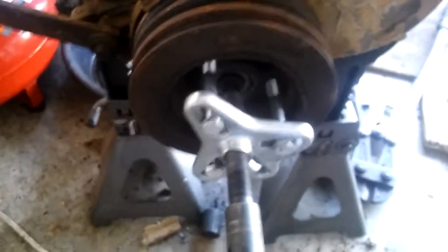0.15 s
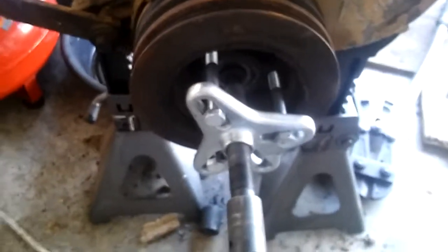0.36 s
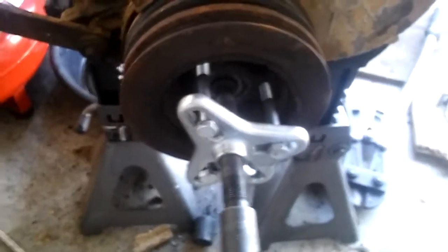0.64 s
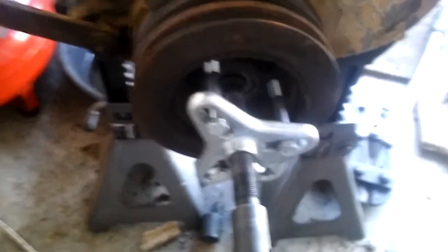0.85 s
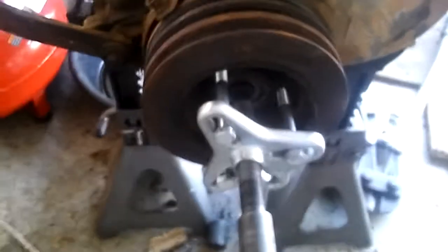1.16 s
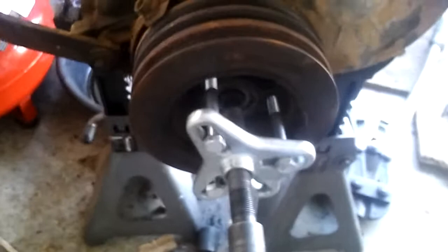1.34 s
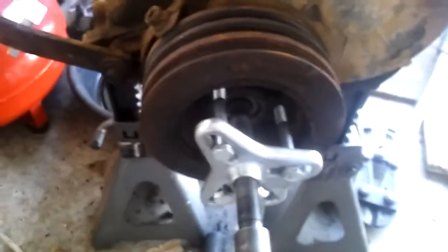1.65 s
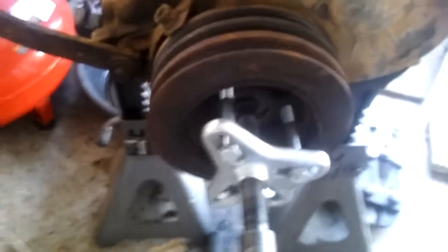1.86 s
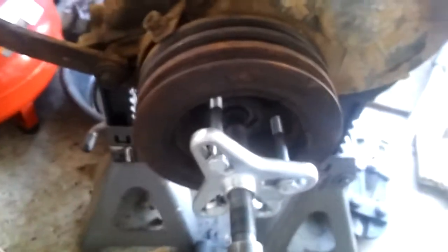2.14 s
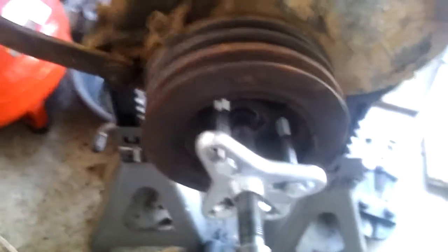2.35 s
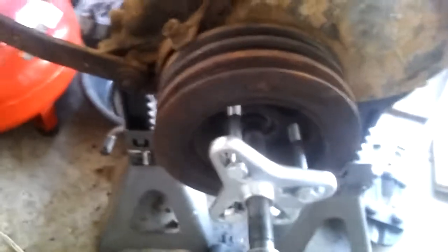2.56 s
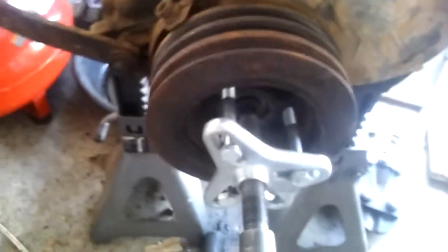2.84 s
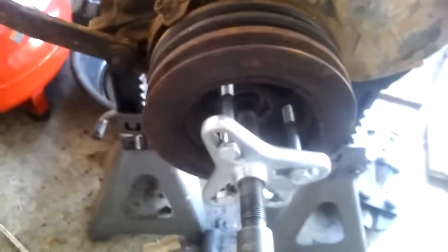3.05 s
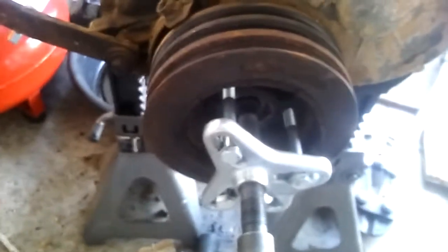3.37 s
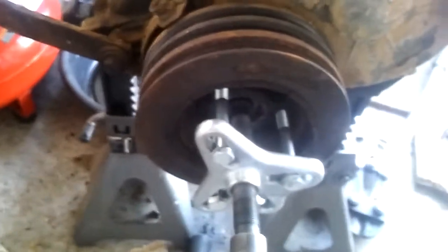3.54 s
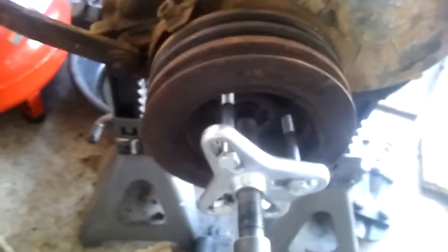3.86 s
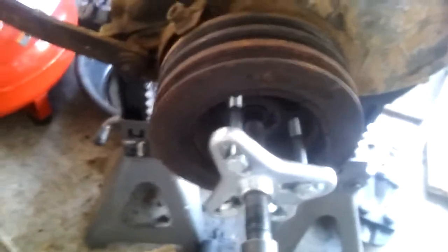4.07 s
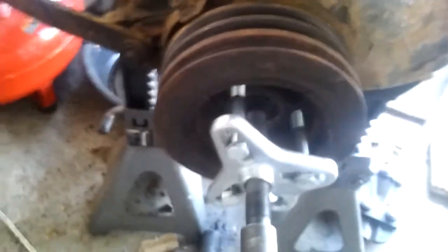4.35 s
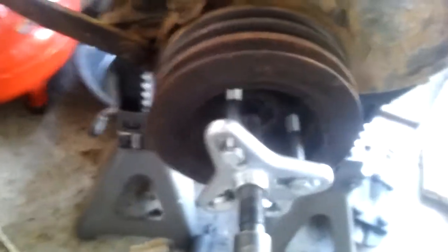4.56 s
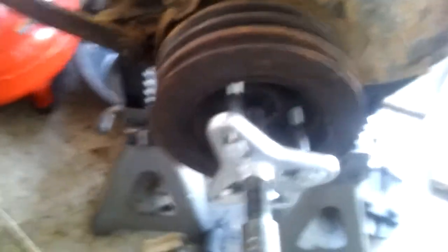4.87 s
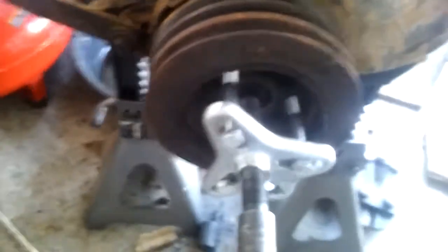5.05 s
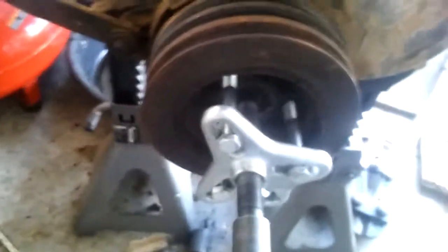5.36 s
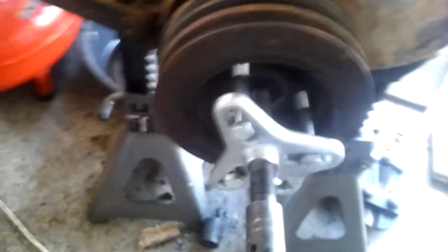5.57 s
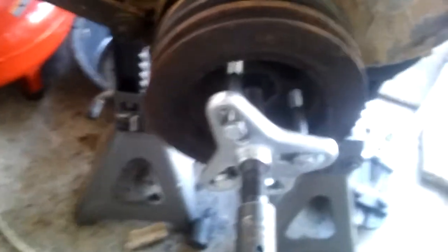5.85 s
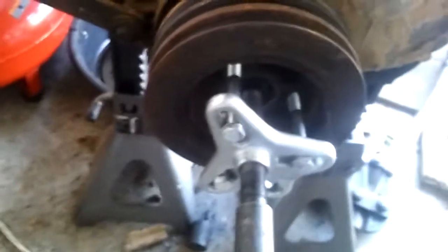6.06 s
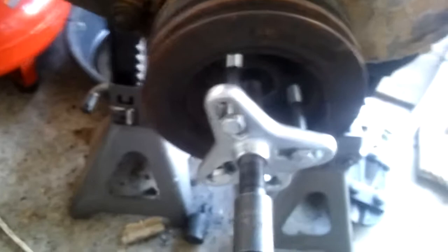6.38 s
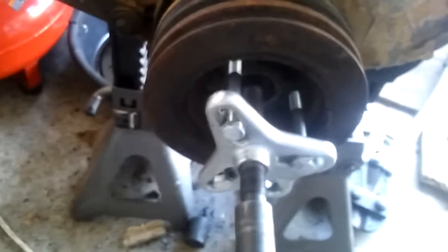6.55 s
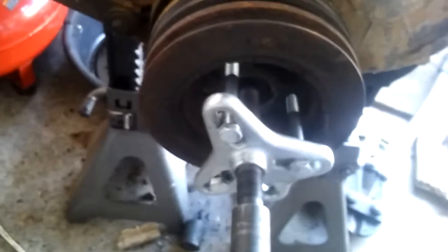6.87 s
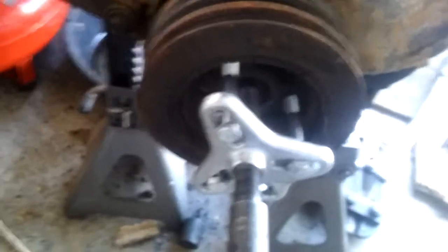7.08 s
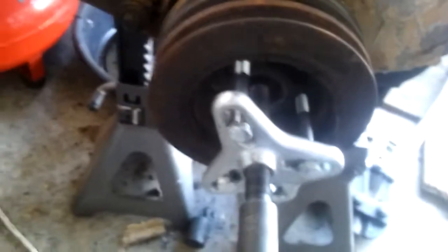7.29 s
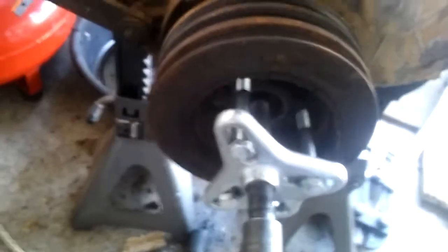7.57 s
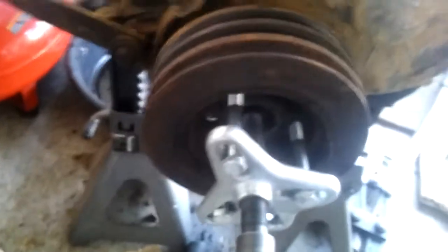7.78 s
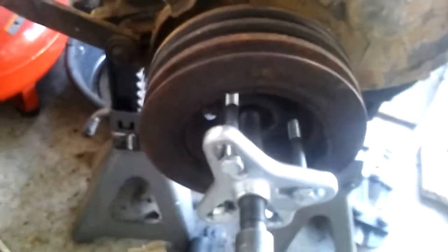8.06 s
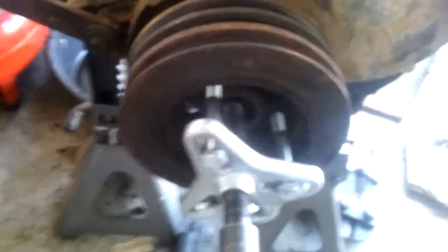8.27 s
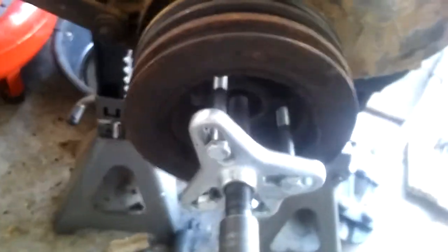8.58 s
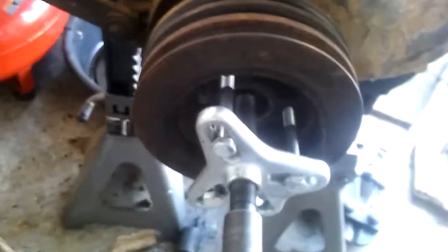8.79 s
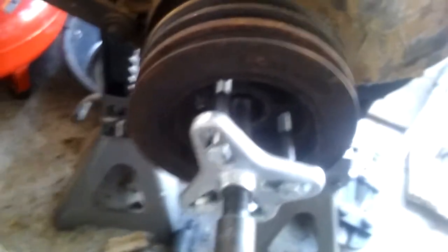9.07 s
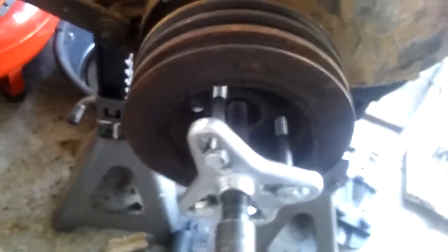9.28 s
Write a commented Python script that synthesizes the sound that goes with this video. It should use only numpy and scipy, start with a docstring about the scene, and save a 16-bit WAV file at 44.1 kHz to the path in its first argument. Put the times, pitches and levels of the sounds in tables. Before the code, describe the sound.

An air impact wrench starts hammering at once on a steel puller fixed to an engine pulley, close to the microphone in a garage. It runs in about fourteen bursts, each a rapid, bright metallic clatter with heavier knocks underneath and a hiss of exhaust air. The first three, up to about 1.2 seconds, are quick blips. From 1.4 to 5.7 seconds they last roughly a third of a second each, with short gaps. From 6 seconds they stretch to half a second or more and beat slightly slower, the longest running from 8.5 to 9.2 seconds. Between bursts the loose socket clacks and rattles, most clearly near 1.8, 3.2, 3.8, 4.5, 5.1 and 8.3 seconds. The blows overload the microphone with a dry crackle, and the room rings briefly after each stop over faint background noise.

```python
"""Impact wrench on a pulley puller

An air impact wrench hammers in fourteen short bursts on a steel puller bolted to an engine pulley.
Three blows make one beat: each clangs the socket and puller, and one also knocks the heavy pulley.
The beat slows as the puller tightens; between bursts the loose socket clacks and rattles.
Exhaust air hisses, the garage rings on after every burst, and the close microphone overloads."""
import sys
import numpy as np
from scipy import signal
from scipy.fft import rfft, irfft, next_fast_len
from scipy.io import wavfile

SR = 44100
rng = np.random.default_rng(int(sys.argv[2]) if len(sys.argv) > 2 else 0)


def wav_out(sig):
    """Save sig, one row per channel (or a flat mono array), as 16-bit PCM at SR to the path in sys.argv[1]."""
    wavfile.write(sys.argv[1], SR, np.round(np.clip(np.atleast_2d(sig).T, -1, 1) * 32767).astype(np.int16))


N = 415863


def amp(db):
    """Decibels to gain."""
    return 10 ** (np.asarray(db) / 20)


def unit_rms(x):
    """The signal scaled to rms 1."""
    return x / np.sqrt(np.mean(x ** 2) + 1e-20)


def curve_at(points, hz):
    """A curve of (Hz, value) points, read on a log frequency axis."""
    freqs, values = np.transpose(points)
    return np.interp(np.log(hz + 1), np.log(freqs), values)


def filtered(x, response):
    """The signal shaped by a complex frequency response."""
    size = next_fast_len(N + SR // 2)
    return irfft(rfft(x, size) * response(np.fft.rfftfreq(size, 1 / SR)), size)[:N]


def noise(spectrum):
    """Noise of rms 1, coloured by (Hz, dB) points."""
    return unit_rms(filtered(rng.standard_normal(N), lambda hz: amp(curve_at(spectrum, hz))))


def pulses(times, sizes):
    """One impulse for each hit."""
    return np.bincount(np.clip(np.round(times * SR).astype(int), 0, N), sizes, N + 1)[:N]


def fading(hits, t60):
    """Amplitude envelope of overlapping hits whose energy dies away."""
    return np.sqrt(signal.lfilter([1], [1, -amp(-120 / (t60 * SR))], hits ** 2))


def ringing(hits, modes):
    """Each hit sets off a set of decaying sine modes."""
    t = np.arange(SR) / SR
    ring = sum(amp(db - 60 * t / t60) * np.sin(2 * np.pi * hz * t) for hz, db, t60 in modes)
    return signal.fftconvolve(hits, ring / np.abs(ring).max())[:N]


# The colour of the room tone. Each row: frequency in Hz, relative level in dB.
ROOM_TONE_SPECTRUM = [(25, -16), (150, -36), (800, 48), (2500, -10), (6000, -13), (16000, -50)]
def room_tone(level_db=-50):
    """A faint, steady bed of midrange noise in the garage."""
    return amp(level_db) * noise(ROOM_TONE_SPECTRUM)


# How long the garage rings. Each row: frequency in Hz, time to fall 60 dB in seconds.
GARAGE_DECAY = [(100, 0.64), (400, 0.56), (1000, 0.61), (2500, 0.54), (3900, 0.59), (5600, 0.47),
                (9000, 0.47), (15000, 0.39)]
def garage_reverb(x, level_db=-12, tails=4, changes_per_s=11):
    """The garage rings on; its tail changes as the hand-held tool and microphone shift."""
    wet = np.zeros(N)
    position = np.arange(N) * changes_per_s / SR
    for i in range(tails):
        hz, t, spectrum = signal.stft(rng.standard_normal(SR), SR, nperseg=256)
        decay = amp(-60 * t / curve_at(GARAGE_DECAY, hz)[:, None])
        tail = signal.istft(spectrum * decay, SR, nperseg=256)[1]
        crossfade = np.sin(np.pi / 2 * np.minimum((position - i) % tails, 2))
        wet += signal.fftconvolve(x * crossfade, tail / np.linalg.norm(tail))[:N]
    return amp(level_db) * wet


# The colour of the exhaust air. Each row: frequency in Hz, relative level in dB.
EXHAUST_SPECTRUM = [(60, -54), (250, 5.5), (1500, -6.5), (4000, -6), (6000, -4), (9000, -7), (16000, -20.5)]
def exhaust(level_db=-17, spin_up_s=0.029, run_down_t60=0.3):
    """Air leaves the motor from just before the first blow and dies after the trigger is let go."""
    t = np.arange(N) / SR
    flow = np.zeros(N)
    for start, end in TRIGGER_PULLS:
        opening = np.clip((t - start) / spin_up_s + 1, 0, 1) ** 2
        run_down = amp(-60 * np.clip(t - end, 0, 1) / run_down_t60)
        flow += opening * run_down
    return amp(level_db) * flow * noise(EXHAUST_SPECTRUM)


# The loose socket's distinct clacks. Each row: start in seconds, strength in dB.
SOCKET_CLACKS = [(.712, -4.5), (.83, -2.5), (1.795, 3), (3.161, 9.5), (3.198, -6), (3.803, 4),
                 (3.842, -3.5), (4.122, -16), (4.453, 9.5), (5.112, 4.5), (5.365, -10), (5.753, -19),
                 (5.785, -7.5), (8.277, -3), (8.334, 4.5), (8.529, -19)]
def socket_rattle(rattle_db=-17, rattle_t60=0.63, scatter_db=3, count=6, slack_s=0.1, grip_db=-10):
    """The socket clacks just before some bursts start and rattles as the motor coasts: the hits, and the same
    hits damped by grip."""
    ends = np.transpose(TRIGGER_PULLS)[1]
    delays = rng.uniform(0.043, 0.25, (len(ends), count))
    rattle_levels = rattle_db - 60 * delays / rattle_t60 + scatter_db * rng.standard_normal(delays.shape)
    clack_times, clack_levels = np.transpose(SOCKET_CLACKS)
    times = np.append(clack_times, ends[:, None] + delays)
    levels = np.append(clack_levels, rattle_levels)
    since_burst = times - ends[np.searchsorted(ends, times) - 1]
    tightness = np.clip(1 - since_burst / slack_s, 0, 1)
    return pulses(times, amp(levels)), pulses(times, amp(levels + grip_db * tightness))


# The socket's clink. Each row: pitch in Hz, relative level in dB, time to fall 60 dB in seconds.
SOCKET_MODES = [(1015, -8, 0.063), (1687, -7, 0.11), (1986, 1, 0.098), (2280, -7, .06), (2880, -1.5, 0.095)]
def socket_ring(damped_clacks, level_db=-4):
    """The socket rings on the bolt at each clack; the slacker it sits, the more it rings."""
    return amp(level_db) * ringing(damped_clacks, SOCKET_MODES)


# The body of pulley and engine block. Each row: resonance in Hz, width in Hz, relative level in dB.
PULLEY_MODES = [(230, 75, -2.5), (413, 100, 1), (633, 95, 2.5), (778, 69, -4.5), (1408, 250, 1.5)]
def pulley_knock(knocks, blows, level_db=-9.5, blow_share=0.61, chatter_share=0.13, chatter_t60=0.019):
    """Knocks and lighter blows thump the heavy pulley; the contact chatters briefly after each push."""
    push = knocks + blow_share * blows
    chatter = chatter_share * fading(push, chatter_t60) * rng.standard_normal(N)
    body = lambda f: sum(amp(db) * 1j * f * width / (hz * hz - f * f + 1j * f * width)
                         for hz, width, db in PULLEY_MODES)
    return amp(level_db) * unit_rms(filtered(push + chatter, body))


def overload_crackle(blows, clacks, gain_db=-6, t60=0.074, clack_db=-10):
    """A dry, bright crackle on each blow and clack, like a microphone overloading."""
    envelope = fading(blows + amp(clack_db) * clacks, t60)
    return amp(gain_db) * envelope * noise([(5000, -43), (9000, -47), (12000, 5), (16000, 7)])


# The colour of the clang of socket and puller. Each row: frequency in Hz, relative level in dB.
CLANG_SPECTRUM = [(40, -41), (180, -7.5), (500, -9.5), (1050, -6), (1500, -5), (2200, -1.5), (2900, -3),
                  (3800, -11), (4600, -7), (5250, 2.5), (6000, -0.5), (6900, -3.5), (8200, -17.5),
                  (9200, -30), (9900, -24), (11000, -30), (16000, -33)]
# The steel's lasting ring. Each row: pitch in Hz, relative level in dB, time to fall 60 dB in seconds.
STEEL_MODES = [(800, -8, 1.0), (1640, 7, 0.29), (2330, -2, 0.6), (2752, -12, 0.86)]
def puller_clang(blows, clacks, clang_db=9, clang_t60=0.063, clack_t60=0.046, ring_db=-31):
    """Blows and clacks wake a dense, quickly damped clang; the blows also leave a faint ring."""
    envelope = np.hypot(amp(clang_db) * fading(blows, clang_t60), fading(clacks, clack_t60))
    ring = amp(ring_db) * unit_rms(ringing(blows, STEEL_MODES))
    return envelope * noise(CLANG_SPECTRUM) + ring


# The bursts of hammering. Each row: first blow in seconds, stop in seconds.
TRIGGER_PULLS = [(0.0, 0.19), (.501, .68), (.964, 1.186), (1.435, 1.76), (2.037, 2.383), (2.662, 3.11),
                 (3.4, 3.807), (4.136, 4.405), (4.711, 5.048), (5.38, 5.698), (6.057, 6.588),
                 (6.906, 7.385), (7.65, 8.25), (8.549, 9.24)]
# The tempo, slowing as the puller tightens. Each row: time in seconds, beats per second.
HAMMER_TEMPO = [(0, 16.6), (3.4, 16.5), (5.4, 15.15), (7, 14.9)]
def hammer(accents_db=(0, -2, -4), first_db=-6, scatter_db=2.5, jitter_s=0.0022,
           first_beat_s=0.039, offset_s=0.004, bounce_share=0.56, recoil_share=0.93):
    """The hammer strikes three blows a beat and knocks the pulley once: impulses for both."""
    blows, knocks = np.zeros(N), np.zeros(N)
    steps = np.arange(-6, 40)  # enough blows to span the longest burst
    count, place_in_beat = len(steps), steps % 3
    for start, end in TRIGGER_PULLS:
        beats_per_s = np.interp(start, *np.transpose(HAMMER_TEMPO))
        grid = start + first_beat_s + steps / (3 * beats_per_s)
        in_burst = (grid > start) & (grid + offset_s < end)
        times = grid + offset_s + jitter_s * rng.standard_normal(count)
        levels = np.array(accents_db)[place_in_beat] + scatter_db * rng.standard_normal(count)
        times = np.append(start, times[in_burst])
        sizes = amp(np.append(first_db, levels[in_burst]))
        # the socket has play, so every blow bounces once
        bounce_s = rng.uniform(0.003, 0.011, count)[:len(times)]
        blows += pulses(times, sizes) + bounce_share * pulses(times + bounce_s, sizes)
        # the pulley takes an even push just ahead of the clang, then recoils
        on_beat = in_burst & (place_in_beat == 0)
        push_times = grid[on_beat] - offset_s
        even = np.ones(len(push_times))
        recoil_s = rng.uniform(0.00422, 0.0052, count)[on_beat]
        knocks += pulses(push_times, even) + recoil_share * pulses(push_times + recoil_s, even)
    return blows, knocks


def scene():
    """Wrench, puller and pulley in the garage; the crackle stays out of the reverb."""
    blows, knocks = hammer()
    clacks, damped_clacks = socket_rattle()
    metal = puller_clang(blows, clacks) + pulley_knock(knocks, blows) + socket_ring(damped_clacks)
    direct = metal + exhaust()
    return (direct + overload_crackle(blows, clacks) + garage_reverb(direct) + room_tone())[None]


def record(dry, duck_rms=1.25, duck_s=0.05, ceiling=0.62, low_cut_hz=75, lag_hz=6000, top_hz=15850):
    """Gain control ducks each burst a little; the input still clips, and filters reshape the peaks."""
    pole = np.exp(-1 / (duck_s * SR))
    power = signal.lfilter([1 - pole], [1, -pole], dry[0] ** 2)
    ducked = dry[0] / np.sqrt(1 + power / duck_rms ** 2)
    overloaded = ducked / (1 + np.abs(ducked / ceiling) ** 10) ** (1 / 10)
    low_cut = lambda hz: (1j * hz / (low_cut_hz + 1j * hz)) ** 2
    phase_lag = lambda hz: (lag_hz - 1j * hz) / (lag_hz + 1j * hz)
    high_cut = lambda hz: np.clip((top_hz - hz) / 300 + 0.5, 0, 1)
    reshaped = filtered(overloaded, lambda hz: low_cut(hz) * phase_lag(hz))
    return filtered(np.clip(reshaped, -1, 1), high_cut)[None]


dry = scene()
out = record(dry)
wav_out(out)
```